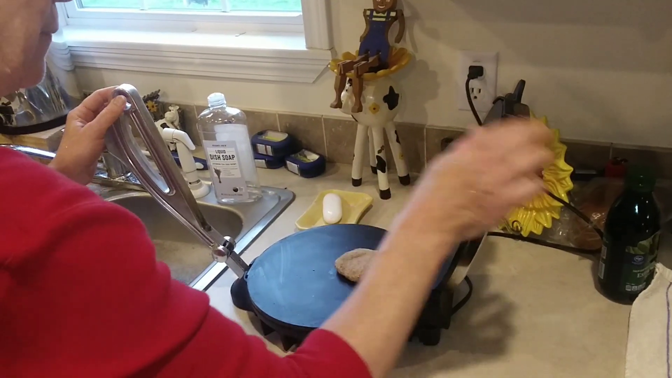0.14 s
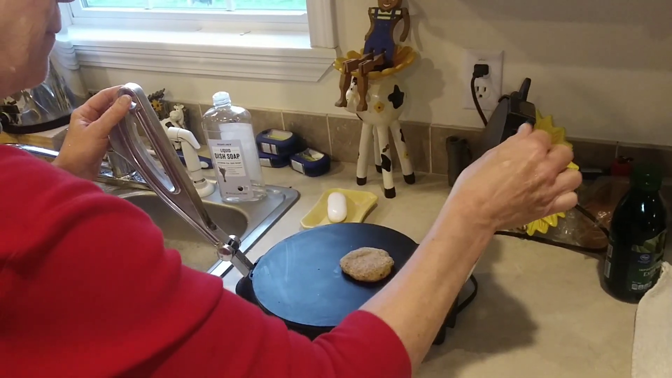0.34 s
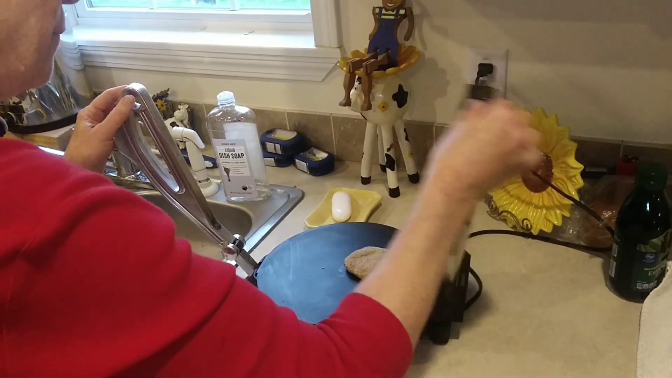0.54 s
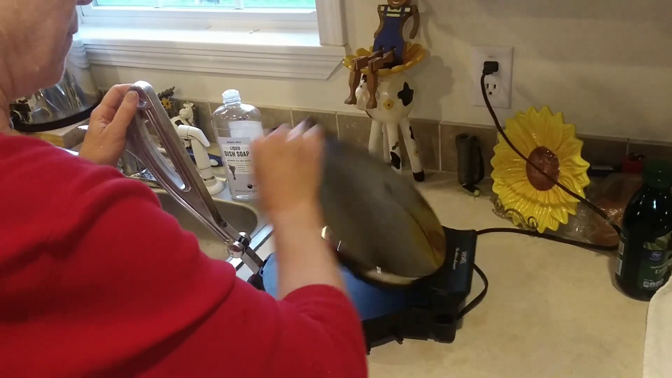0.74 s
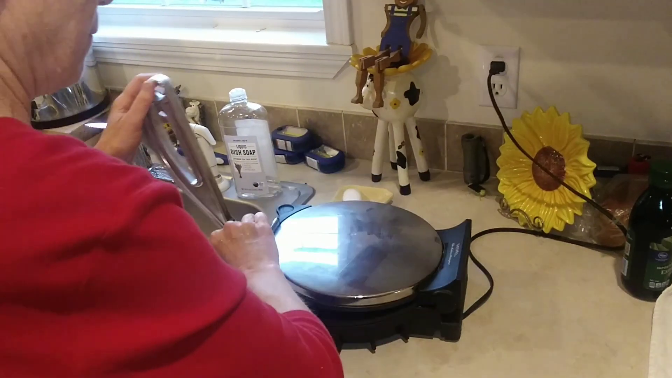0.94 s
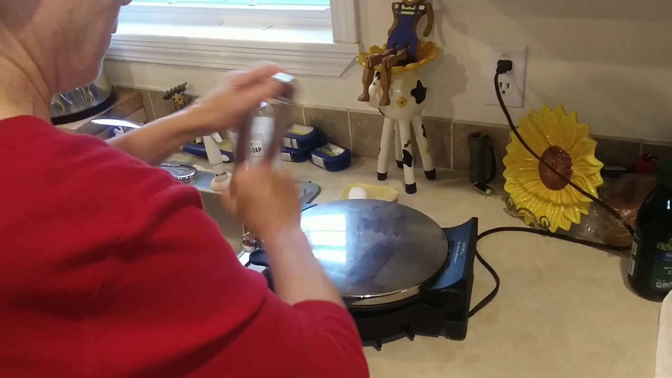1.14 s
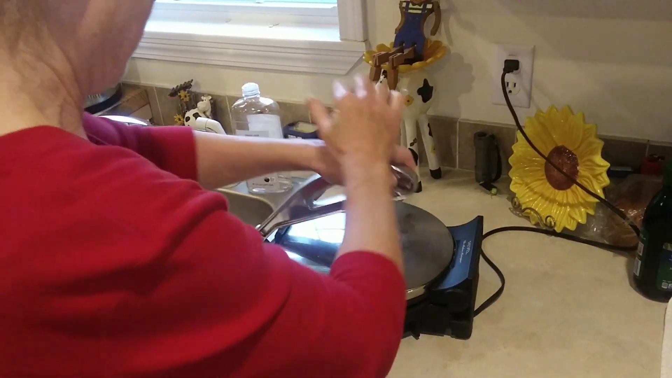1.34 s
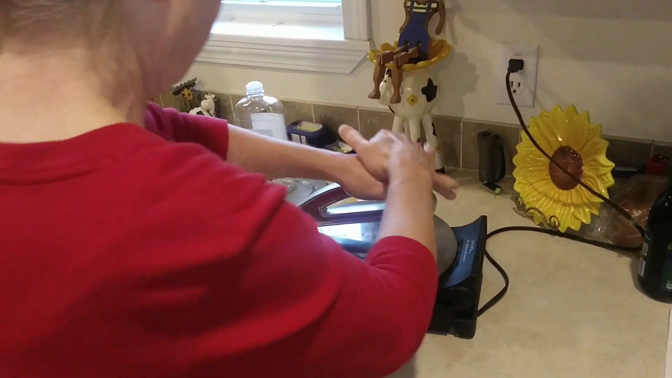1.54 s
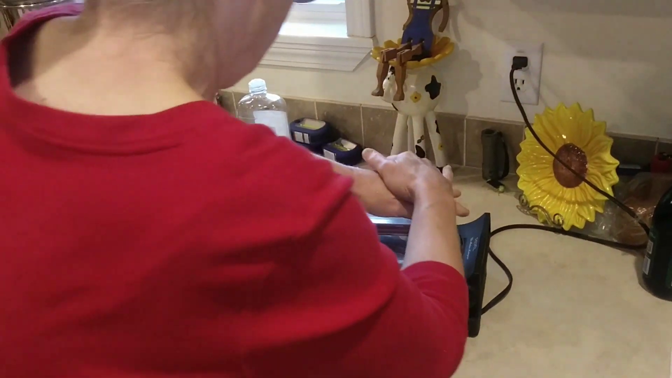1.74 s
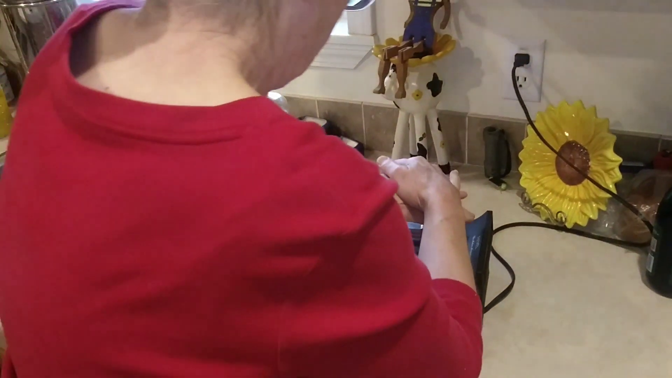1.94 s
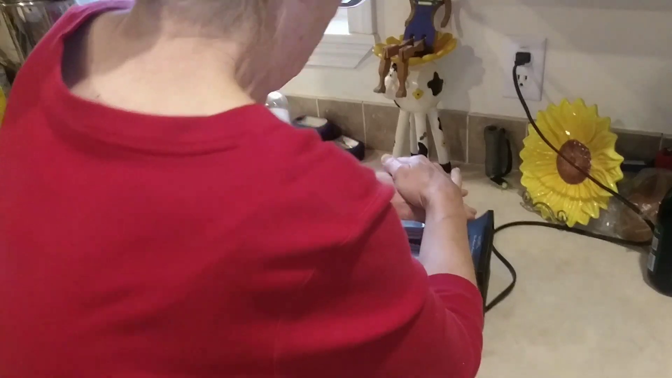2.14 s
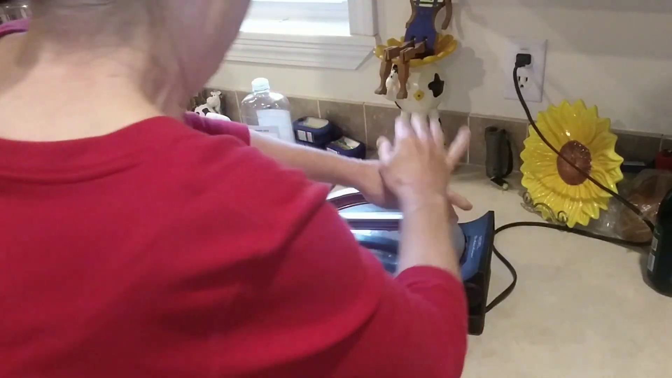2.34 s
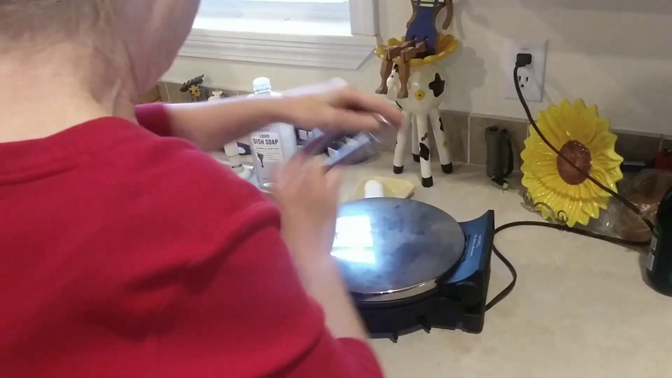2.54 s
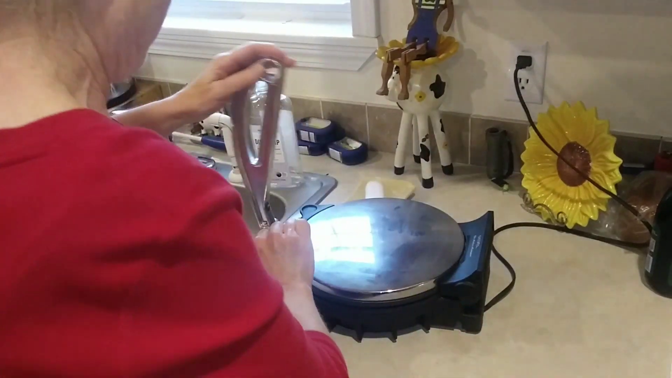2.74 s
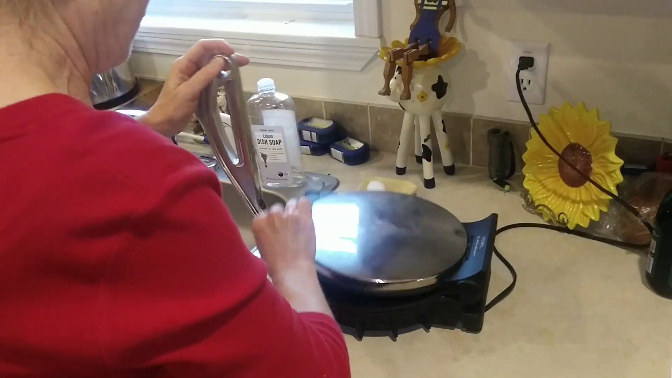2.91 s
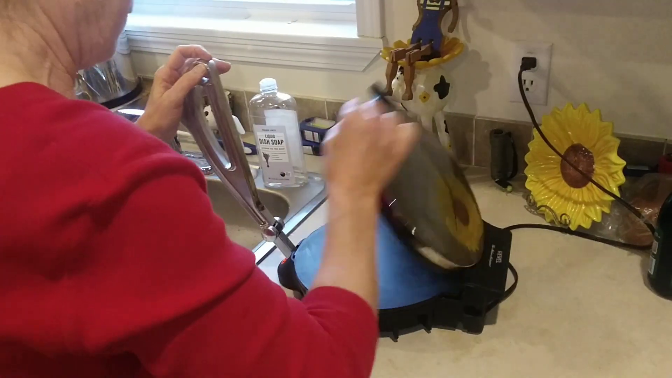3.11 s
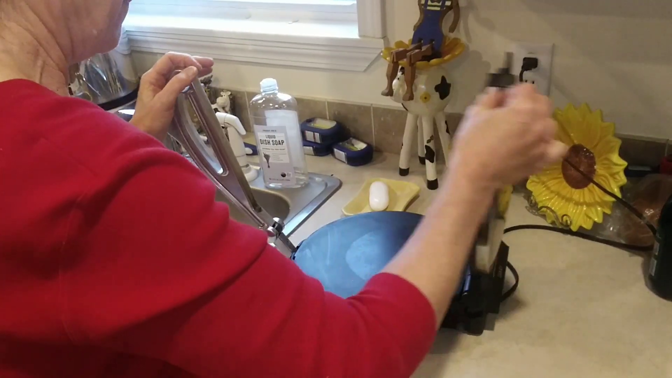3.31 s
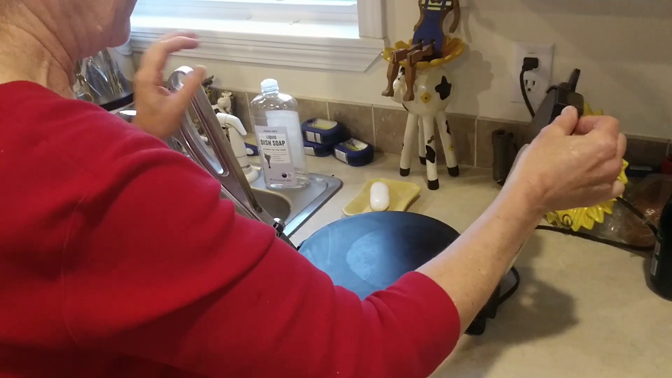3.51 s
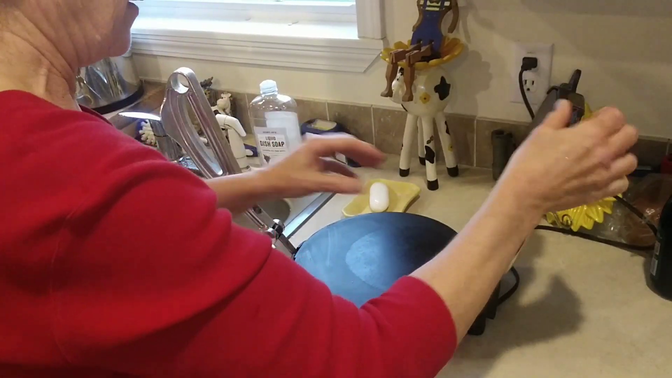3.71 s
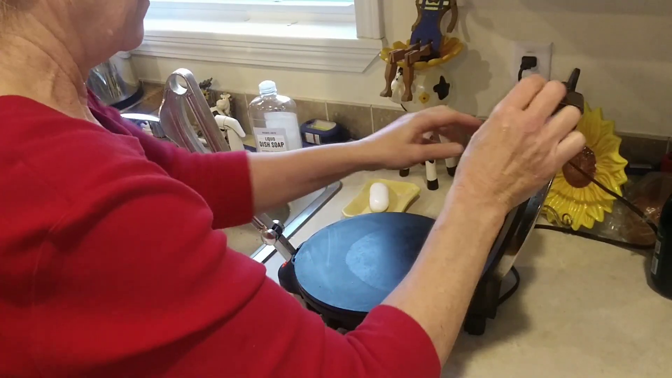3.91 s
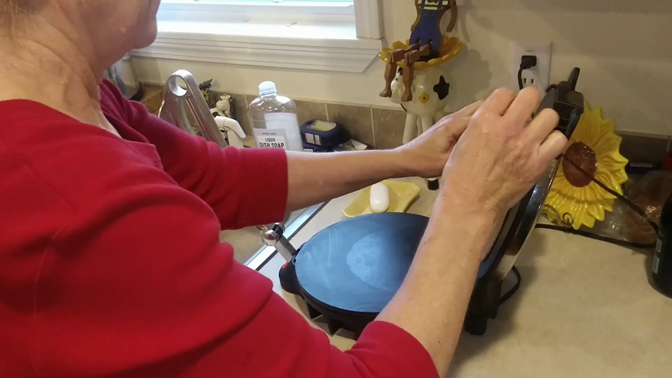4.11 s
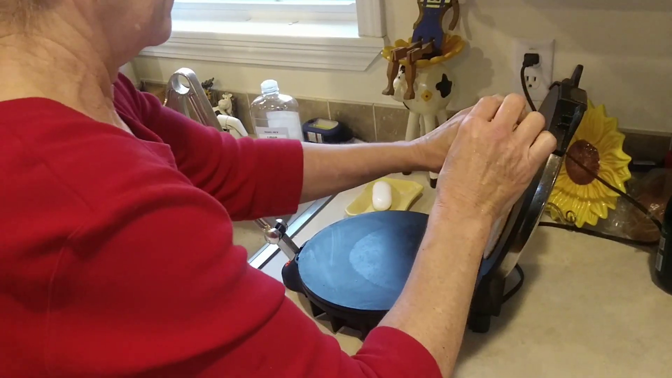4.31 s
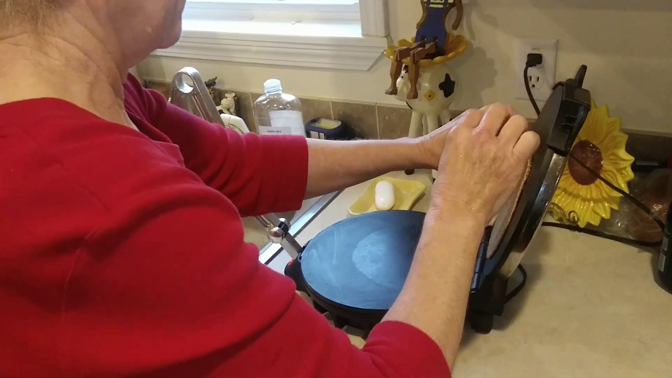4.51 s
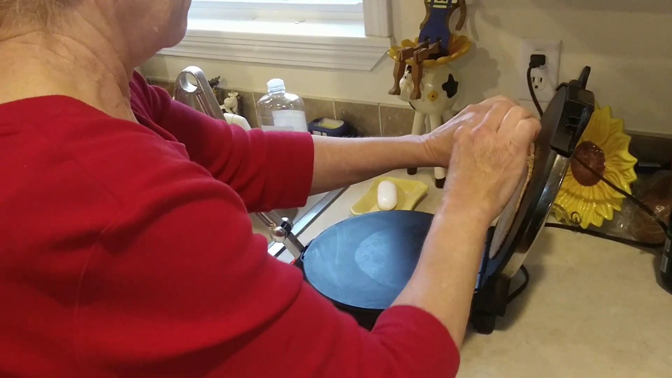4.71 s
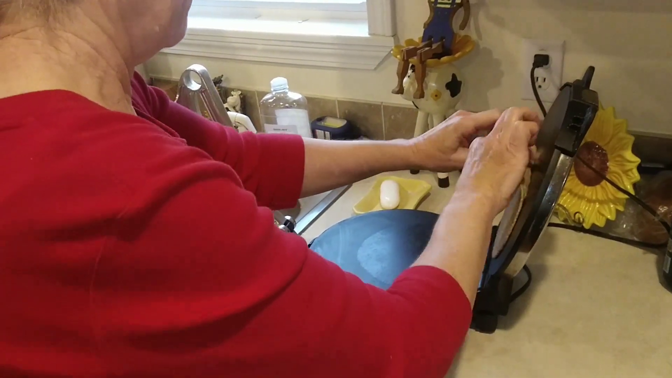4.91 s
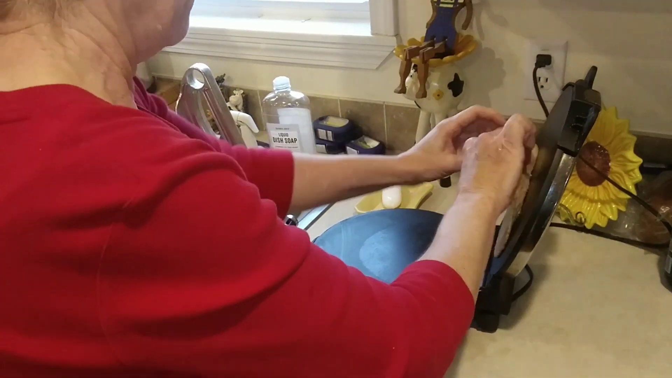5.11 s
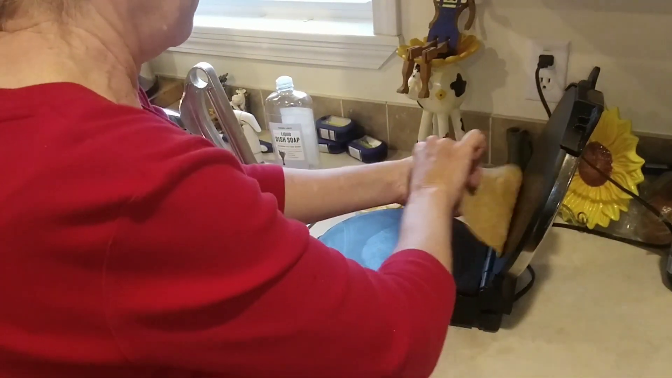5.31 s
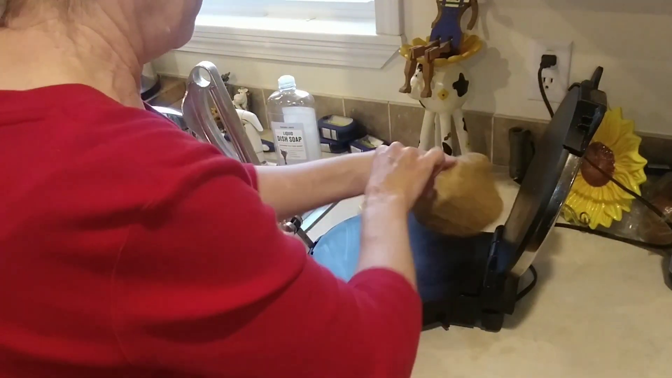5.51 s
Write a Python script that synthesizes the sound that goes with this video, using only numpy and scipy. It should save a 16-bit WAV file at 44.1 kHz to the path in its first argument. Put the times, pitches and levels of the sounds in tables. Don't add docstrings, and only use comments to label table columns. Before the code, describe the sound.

Close, bright metal clatter in a kitchen: lid rattles shut, lever slams, clamp snaps, lighter knocks on release, lid hits its stop, faint clicks.

```python
import sys
import numpy as np
from scipy import signal
from scipy.fft import rfft, irfft, next_fast_len
from scipy.io import wavfile

SR = 44100
rng = np.random.default_rng(int(sys.argv[2]) if len(sys.argv) > 2 else 0)


def rack_gain(trim_db):
    fader = np.asarray(trim_db, float)
    return 10 ** (fader / 20)


def int16_out(signal):
    q = np.round(np.clip(np.atleast_2d(signal).T, -1, 1) * 32767)
    wavfile.write(sys.argv[1], SR, q.astype(np.int16))


N = 249279


def rms_one(x):
    return x / np.sqrt(np.mean(x ** 2) + 1e-20)


def peak_one(rows):
    return rows / np.abs(rows).max(axis=1, keepdims=True)


def band(x, low_hz, high_hz):
    sos = signal.butter(2, [low_hz, min(high_hz, .45 * SR)], "band", fs=SR, output="sos")
    return signal.sosfilt(sos, x)


def ring(x, hz, t60):
    r, w = rack_gain(-60 / (t60 * SR)), 2 * np.pi * hz / SR
    return signal.lfilter([0, np.sin(w)], [1, -2 * r * np.cos(w), r * r], x + 1e-18)


def coloured(spectrum):
    hz, level_db = np.transpose(spectrum)
    size = next_fast_len(N)
    grid = np.arange(size // 2 + 1) * SR / size + 1
    gain = rack_gain(np.interp(np.log(grid), np.log(hz), level_db))
    return rms_one(irfft(rfft(rng.standard_normal(size)) * gain, size)[:N])


def add(out, sounds, times):
    for sound, s in zip(sounds, times):
        i = round(s * SR)
        out[i:i + len(sound)] += sound[:N - i]


REGISTERS_HZ = [40, 190, 650, 2400, 5000, 8000, 15000]


def blows(table, modes, counter_db, share, ring_db, gap_db, top_db, tail_db, tail_s):
    start_s, plate_db, hard_db, weight_db, contact_ms = np.transpose(table)
    body_db = plate_db + weight_db
    thud_db = counter_db + share * (body_db - body_db.max())
    crack_db = plate_db + hard_db - 16.5
    gap_level_db = np.minimum(plate_db, crack_db) + gap_db
    shape = np.transpose([thud_db - 33.0, thud_db - 3, body_db - 7.5, plate_db,
                          gap_level_db, crack_db, crack_db + top_db])

    def level_at(hz):
        return np.array([[np.interp(np.log(hz), np.log(REGISTERS_HZ), row)] for row in shape])

    t = np.arange(round(.3 * SR)) / SR
    luck = rng.standard_normal((len(table), 2 * len(t) + len(modes)))
    grain_s, grain_db = .0025, 1.8
    step = round(grain_s * SR)
    uneven = np.repeat(luck[:, ::step], step, axis=1)[:, :len(t)]
    lumps = rack_gain(grain_db * uneven.clip(-1.5, 2))
    hum = rack_gain(tail_db) * np.exp(-t / tail_s)
    edges, rattle = 50 * 2 ** np.arange(0, 9, .5), 0
    for k, (low, high) in enumerate(zip(edges, edges[1:])):
        hz = np.sqrt(low * high)
        lasts = np.clip(contact_ms, .5, 30)[:, None] / 1000 * (hz / 3000) ** -.25
        attack = 1 - np.exp(-t / (0.13 * lasts))
        fade = (np.exp(-(t / lasts) ** 1.2) + hum) * lumps * attack
        noise = luck[:, k % 2 * len(t):][:, :len(t)]
        rattle = rattle + rack_gain(level_at(hz)) * peak_one(band(noise * fade, low, high))

    mode_spread_db, twin_db, twin_ratio, longest_ring_s = 2.5, -5, 1.022, .16
    total = rattle
    for k, (hz, db, t60) in enumerate(modes):
        t60 = np.clip(t60, .008, longest_ring_s)
        tone = ring(rattle, hz, t60) + rack_gain(twin_db) * ring(rattle, hz * twin_ratio, t60 / 2)
        tone_db = level_at(hz) + db + ring_db + mode_spread_db * luck[:, [-k - 1]]
        total = total + rack_gain(tone_db) * peak_one(tone)
    out = np.zeros(N)
    add(out, total * np.cos(t / t[-1] * np.pi / 2), start_s - .001)
    return out


# start_s, strength_db, hardness_db, weight_db, contact_ms
LEVER_DOWN = [
    (1.3582, -53, 4, -13.5, 1.67),
    (1.423, -13, 15.5, -2, 3.5),
    (1.4283, -14.5, 10.5, 2.5, 5.0),
]
# pitch_hz, level_db, t60_s
LEVER_DOWN_MODES = [(152, 6, .12), (551, -4, .15), (625, 0, .08), (915, -3, .08), (1060, -3, .06),
                    (1394, 0, .06), (1577, -2, .16), (1762, -2, .16), (1912, -12, .12), (2035, -13, .12),
                    (2450, -6, .05), (2945, -14, .08), (3358, -12, .1)]


def lever_down():
    return blows(LEVER_DOWN, LEVER_DOWN_MODES, counter_db=-31, share=.9, ring_db=-5.5,
                 gap_db=-10.0, top_db=-12.5, tail_db=-15.0, tail_s=0.051)


# start_s, strength_db, hardness_db, weight_db, contact_ms
CLAMP = [
    (1.67, -22.5, 28, -14.5, 2.2),
    (1.6743, -21, 22, -13, 5.4),
]
# pitch_hz, level_db, t60_s
CLAMP_MODES = [(1292, -2, 0.15), (1700, -5.5, 0.081), (2570, -1, .14), (2050, -4, 0.12), (3200, -9, .03),
               (8000, -7, .05)]


def clamp():
    return blows(CLAMP, CLAMP_MODES, counter_db=-69.0, share=1, ring_db=-11.5,
                 gap_db=-8.5, top_db=-16.5, tail_db=-16.0, tail_s=.052)


# start_s, strength_db, hardness_db, weight_db, contact_ms
LID_DOWN = [
    (.9985, -48.5, 8, 3.5, 11),
    (1.0181, -23.5, -20.5, 2.5, 4.4),
    (1.0296, -31, 1, -2, 7.4),
    (1.0465, -23, 10.5, 1, 3.9),
    (1.0587, -33.5, 8, -4.5, 3.2),
    (1.1109, -25.5, -2.5, 4.5, 5.6),
    (1.1281, -40.5, -2, 4, 16),
    (1.1594, -38.5, 6, 7.5, 3.4),
]
# pitch_hz, level_db, t60_s
LID_DOWN_MODES = [(160, -2, .14), (556, 4, .1), (960, -12, .08), (1142, -6, .03), (1300, 0, .03),
                  (1600, -2, .06), (1865, -2, .06)]


def lid_down():
    return blows(LID_DOWN, LID_DOWN_MODES, counter_db=-39.5, share=0.23, ring_db=-3.0,
                 gap_db=-11.0, top_db=-9.5, tail_db=-15.0, tail_s=.032)


# start_s, strength_db, hardness_db, weight_db, contact_ms
LEVER_UP = [(2.4022, -41.5, 15.5, -10, 7), (2.462, -51, 14.5, 9, 4.1), (2.6314, -34.5, 9.5, 3.5, 4.9),
            (2.6589, -39, -1, -7, 6), (2.7274, -55.5, 21.5, -16, 9.8), (2.7854, -49.5, 16, -1.5, 16),
            (2.919, -36, 10.5, -7, 12), (2.9273, -29, 8.5, -30, 5.1), (2.9603, -27.5, 13, 3, 11),
            (2.9793, -29.5, 0, 1.5, 10.3), (3, -31.5, 2.5, 1, 4.6), (3.046, -38.5, 1.5, 5, 6.9),
            (3.1684, -41, -22, 13.5, 2.7)]
# pitch_hz, level_db, t60_s
LEVER_UP_MODES = [(215, 4, 0.048), (396, -2, 0.03), (612, -2.5, 0.047), (1296, -11.5, 0.065),
                  (1893, -12.5, 0.043)]


def lever_up():
    return blows(LEVER_UP, LEVER_UP_MODES, counter_db=-41, share=1.18, ring_db=0.0,
                 gap_db=-9.0, top_db=-11.0, tail_db=-15.0, tail_s=0.046)


# start_s, strength_db, hardness_db, weight_db, contact_ms
LID_UP = [
    (3.353, -55, 11.5, 9, 6.2),
    (3.3742, -46, 6.5, -9, 3.8),
    (3.3976, -40.5, 4.5, 3, 10.5),
    (3.5425, -46, -14, 8, 1.6),
    (3.5541, -39.5, -13.5, 6.5, 8),
    (3.5696, -18.5, -1, -11.5, 7.1),
    (3.5955, -37, 11.5, -5.5, 12.7),
]
# start_s, strength_db, hardness_db, weight_db, contact_ms
LID_REST = [
    (3.6903, -29.5, 8.5, -10.5, 8.7),
    (3.742, -60.5, 22, 10, 8),
    (3.735, -62, 2, 12, 4),
]
# pitch_hz, level_db, t60_s
LID_UP_MODES = [(214, 0, .12), (569, -5, .05), (966, -9, .05), (1490, -2, .09), (1570, -5, .06),
                (2100, -12, .03), (2700, -6, .02), (3000, -2, .03), (3700, -4, .015), (4300, -2, .015)]


def lid_up():
    opening = blows(LID_UP, LID_UP_MODES, counter_db=-47.5, share=.1, ring_db=-3.5,
                    gap_db=1.0, top_db=-11.0, tail_db=-21.0, tail_s=0.054)
    rest = blows(LID_REST, LID_UP_MODES, counter_db=-57.5, share=0.095, ring_db=-22.0,
                 gap_db=-7.0, top_db=-3.0, tail_db=-24.5, tail_s=0.056)
    return opening + rest


# start_s, strength_db, hardness_db, weight_db, contact_ms
REACH = [
    (0.4781, -26.5, -17.5, -17.5, 5.2),
    (0.5292, -36, -41, -1.5, 9.2),
    (0.5692, -34, -45, -4, 10.7),
    (0.8414, -48, -1, 17, 3.2),
]
# pitch_hz, level_db, t60_s
REACH_MODES = [(560, -4, .04), (900, -5, .04), (1130, -1, .03), (1450, -4, .03), (2350, -2, .012),
               (2800, -1, .02), (3300, 2, .02), (4200, -4, .015)]


def reach():
    return blows(REACH, REACH_MODES, counter_db=-51, share=0.4, ring_db=-6.0,
                 gap_db=6.0, top_db=-12.0, tail_db=-17.5, tail_s=0.047)


# start_s, strength_db, hardness_db, weight_db, contact_ms
LEAN = [
    (1.8088, -58, 12, 12, 8),
    (2.0192, -31.5, 6, 6.5, 2.5),
    (2.0953, -53.5, 14, -8, 13),
    (2.3037, -63, 24.5, 11, 4.9),
]
# pitch_hz, level_db, t60_s
LEAN_MODES = [(411, -5, 0.12), (410, 1.5, 0.05), (602, 1, 0.05), (812, 1.5, 0.055), (1709, -1.5, 0.09),
              (2430, -9, 0.068), (3180, -3, 0.06), (4230, -5, 0.045)]


def lean():
    return blows(LEAN, LEAN_MODES, counter_db=-45.0, share=0.9, ring_db=-4.5,
                 gap_db=0.5, top_db=-12.0, tail_db=-13.5, tail_s=0.024)


# start_s, strength_db, hardness_db, weight_db, contact_ms
SNAPS = [
    (0.0268, -35.5, 36.5, 1.5, 10.7),
    (0.0292, -35.5, 14.5, 1.5, 5.5),
]
# pitch_hz, level_db, t60_s
SNAP_MODES = [(602, -0.5, 0.053), (1762, -6.5, 0.044), (2900, -8.5, 0.082)]


def first_snaps():
    return blows(SNAPS, SNAP_MODES, counter_db=-62, share=1, ring_db=-1.0,
                 gap_db=-1.5, top_db=-11.0, tail_db=-17.5, tail_s=0.037)


# start_s, strength_db, hardness_db, weight_db, contact_ms
HINGE = [
    (0.734, -37, 19, -4, 6),
    (1.5884, -41, 16, -8, 5),
]
# pitch_hz, level_db, t60_s
HINGE_MODES = [(1190, 0, 0.073), (1450, -1.4, 0.071)]
# start_s, strength_db, hardness_db, weight_db, contact_ms
LATCH = [
    (2.8633, -45.5, 22, -8, 9.5),
]
# pitch_hz, level_db, t60_s
LATCH_MODES = [(1990, -7, .05), (4000, 7, 0.044), (7280, 0.5, 0.027), (9500, -1, 0.067), (10160, -2, .05)]


def hinge_and_latch():
    hinge = blows(HINGE, HINGE_MODES, counter_db=-59.0, share=0.92, ring_db=-4.0,
                  gap_db=-11.5, top_db=-4.0, tail_db=-21.0, tail_s=.03)
    latch = blows(LATCH, LATCH_MODES, counter_db=-77, share=1, ring_db=-5.5,
                  gap_db=-2.5, top_db=-5.0, tail_db=-20.0, tail_s=.03)
    return hinge + latch


# start_s, strength_db, hardness_db, weight_db, contact_ms
CLINKS = [
    (5.1188, -39, 25, -9.5, 6.9),
    (5.1234, -49, 31.5, -18, 5.8),
]
# pitch_hz, level_db, t60_s
CLINK_MODES = [(980, 4, .04), (1400, -6, .03), (1780, -12, .03), (2606, 6, .15), (2900, 0, .03),
               (3758, -1, .12), (6665, -10, .06), (9345, -14, .05), (10460, -10, .08), (12250, -4, .06),
               (13100, -1, .02)]
# start_s, strength_db, hardness_db, weight_db, contact_ms
DOUGH_SNAP = [
    (4.782, -54, 28.5, -2, 9.8),
]


def clinks_and_dough():
    clinks = blows(CLINKS, CLINK_MODES, counter_db=-81, share=1, ring_db=-3.0,
                   gap_db=-4.5, top_db=-2.0, tail_db=-22.0, tail_s=0.04)
    dough_modes = [(7370, -2.1, 0.012), (8060, -6.0, 0.01)]     # pitch_hz, level_db, t60_s
    dough = blows(DOUGH_SNAP, dough_modes, counter_db=-79, share=1, ring_db=0.0,
                  gap_db=-8.5, top_db=-22.0, tail_db=-15.5, tail_s=0.033)
    return clinks + dough


# start_s, peak_db, centre_hz
TICKS = [(2.218, -34, 10700), (2.3412, -30, 10900), (2.37, -26.5, 13000), (2.3774, -43, 10600),
         (2.389, -29, 10900), (2.4036, -24, 10600), (2.4604, -42, 11400), (2.472, -32, 12100),
         (2.5167, -35.5, 12400), (2.053, -43, 11000), (2.5505, -40, 12200), (2.8075, -41, 12000),
         (2.8214, -39, 11500), (3.186, -39, 11800), (3.4461, -35, 11000), (3.4627, -44, 10850),
         (4.0632, -40, 11800), (4.0906, -32.5, 10700)]


def ticks():
    t = np.arange(round(0.053 * SR)) / SR
    out = np.zeros(N)
    for start_s, peak_db, hz in TICKS:
        snap = rng.standard_normal(len(t)) * np.exp(-t / .0014)
        for _ in range(2):
            snap = band(snap, hz * 0.73, hz * 1.3)
        add(out, [rack_gain(peak_db - 13) * snap / np.abs(snap).max()], [start_s - .001])
    return out


# start_s, hardest_s, end_s, peak_db, brightness_db
RUB = [
    (0.403, 0.434, 0.44, -69, 22),
    (0.962, 1.007, 1.07, -55, 9.5),
    (1.039, 1.02, 1.166, -37.5, -0.5),
    (1.14, 1.172, 1.3, -61.5, 13.5),
    (2.287, 2.405, 2.454, -48.5, 17),
    (3.334, 3.401, 3.42, -57, 10.5),
    (3.422, 3.453, 3.465, -66.5, 21.5),
    (5.226, 5.3, 6.04, -74.5, 21.5),
]


def rubbing():
    grains = rng.standard_normal(N) * rack_gain(1.0 * np.minimum(rng.exponential(1, N), 5))
    dull, bright = rms_one(band(grains, 750, 3600)), rms_one(band(grains, 8250, 18000))
    swell_db, fade_db = 17.5, 24
    t, out = np.arange(N) / SR, np.zeros(N)
    for start, hardest, end, db, bright_db in RUB:
        edge = np.clip(np.minimum(t - start, end - t) / 0.0059, 0, 1)
        push = rack_gain(np.interp(t, [start, hardest, end], [db - swell_db, db, db - fade_db]))
        out += edge * push * (dull + rack_gain(bright_db - 18.5) * bright)
    return out


def shudder():
    start_s, gap_s, peak_db, swell_db = 5.6095, 0.014, -49, 9
    k, clicks = np.arange(4), np.zeros(N)
    clicks[((start_s + gap_s * k) * SR).astype(int)] = rack_gain(peak_db - swell_db * np.abs(k - 1.3))
    return ring(clicks, 214, 0.016)


# start_s, end_s, pitch_hz, level_db
SQUEAKS = [
    (0.41, 0.462, 1555, -60),
    (3.813, 4.05, 1490, -77),
]


def squeaks():
    t, out = np.arange(N) / SR, 0
    for start, end, hz, db in SQUEAKS:
        swell = np.sqrt(np.sin(np.pi * np.clip((t - start) / (end - start), 0, 1)).clip(0))
        out = out + rack_gain(db) * swell * rms_one(ring(rng.standard_normal(N), hz, 0.026))
    return out


# pitch_hz, t60_s, echo_db
KITCHEN = [(157, 0.32, -20), (540, 0.31, -9), (1430, 0.36, -5.5), (3860, 0.3, -5.5), (9400, 0.23, -16)]


def kitchen(x):
    t = np.arange(round(.7 * SR)) / SR
    white = rng.standard_normal(len(t)) * np.clip((t - .005) / 0.004, 0, 1)
    centres = np.array(KITCHEN)[:, 0]
    edges = [40, *np.sqrt(centres[1:] * centres[:-1]), 18000]
    echo = 0
    for low, high, (hz, t60, echo_db) in zip(edges, edges[1:], KITCHEN):
        echo = echo + rack_gain(echo_db - 60 * t / t60) * band(white, low, high) / np.sqrt(t60 * SR / 14)
    return signal.fftconvolve(x, echo)[:N] * rack_gain(0.5)


# time_s, stir_db
AIR = [(0.0, 6.5), (0.19, -3.5), (0.64, 1.5), (1.46, 1.5), (1.601, 15.5), (1.65, 10), (2.14, 7),
       (3.13, 4.5), (3.429, -6), (3.56, 4), (4.058, -7), (5.65, -6)]
# pitch_hz, level_db (per Hz)
AIR_LOW = [(18, -52.5), (30, -16.5), (236, -3), (530, -9.5), (1940, -14), (6000, -22), (7800, -50),
           (13200, -120)]
# pitch_hz, level_db (per Hz)
AIR_HIGH = [(3000, -30), (5000, -8.5), (7000, -3.5), (9500, -5.5), (12000, -7), (16000, -7.5)]
# pitch_hz, level_db (per Hz)
SELF_NOISE = [(2500, -24.5), (5000, -5), (9000, -5), (13000, 3), (16000, 5.5)]


def air():
    time_s, db = np.transpose(AIR)
    stir_db = np.interp(np.arange(N) / SR, time_s, db)
    rumble = rack_gain(-68 + 0.47 * stir_db)
    hiss = rack_gain(-76.5 + 1.05 * stir_db)
    return rumble * coloured(AIR_LOW) + hiss * coloured(AIR_HIGH) + rack_gain(-75.5) * coloured(SELF_NOISE)


def scene():
    press = first_snaps() + clamp() + hinge_and_latch() + clinks_and_dough()
    press = press + reach() + lid_down() + lever_down() + lean() + lever_up() + lid_up()
    press = press + rubbing() + shudder() + squeaks()
    small = ticks()
    return (press + small + kitchen(press + rack_gain(-4.5) * small) + air())[None]


def band_limit(x):
    return signal.sosfilt(signal.butter(12, 16510, fs=SR, output="sos"), x)


# pitch_hz, width_hz, level_db
MIC_PEAKS = [(8020, 1257, 21), (9160, 2000, -1.5), (5740, 4900, -9.5)]


def record(dry):
    x = dry
    for hz, width_hz, db in MIC_PEAKS:
        r, w = np.exp(-np.pi * width_hz / SR), 2 * np.pi * hz / SR
        side = (1 - r * r) / 2
        x = x + (rack_gain(db) - 1) * signal.lfilter([side, 0, -side], [1, -2 * r * np.cos(w), r * r], x)
    cutoff_hz, overload = 16350, .76
    x = signal.sosfilt(signal.cheby2(10, 45, cutoff_hz, fs=SR, output="sos"), x)
    load = np.abs(signal.hilbert(x, next_fast_len(N))[:, :N]) / overload + 1e-9
    x = x / (1 + load ** 6) ** (1 / 6)
    return band_limit(x)


dry = scene()
out = record(dry)
int16_out(out)
```